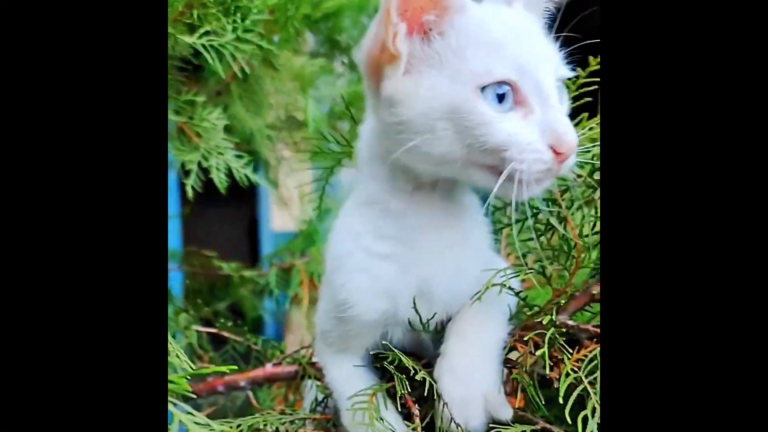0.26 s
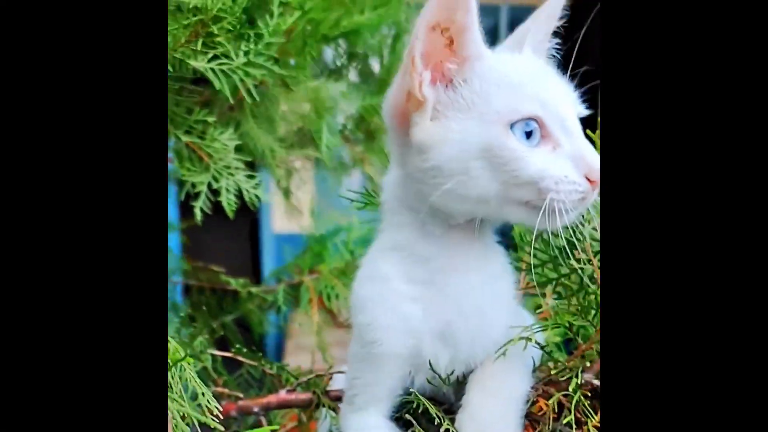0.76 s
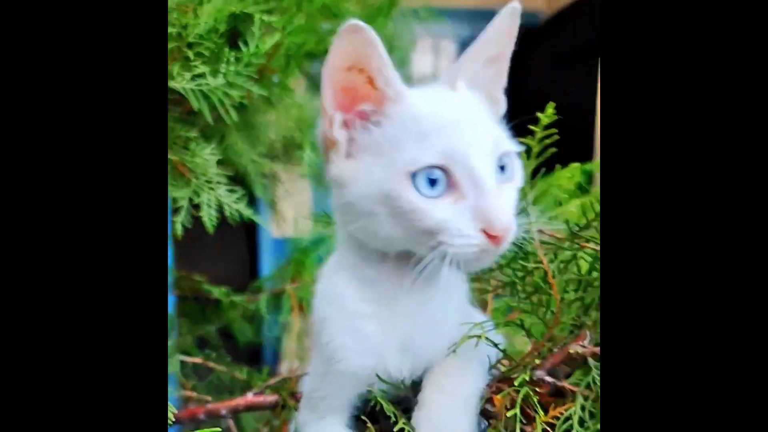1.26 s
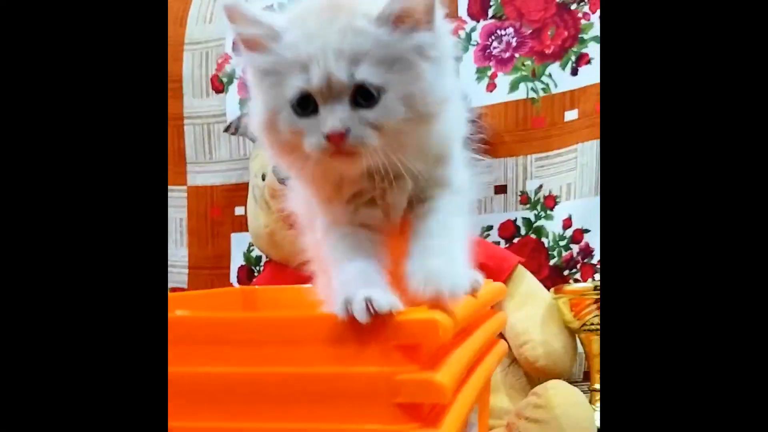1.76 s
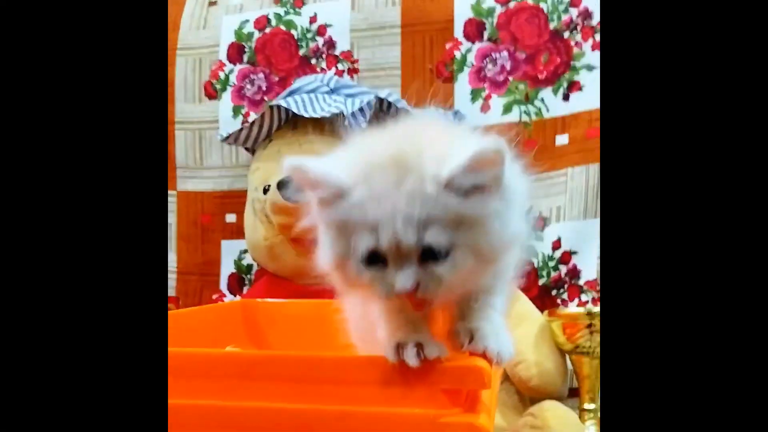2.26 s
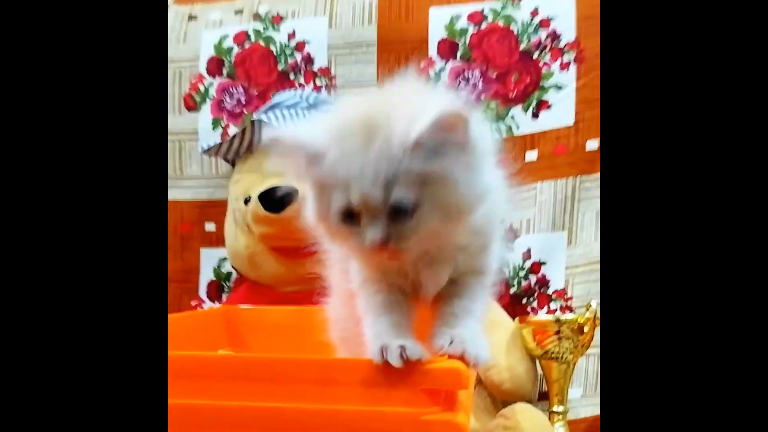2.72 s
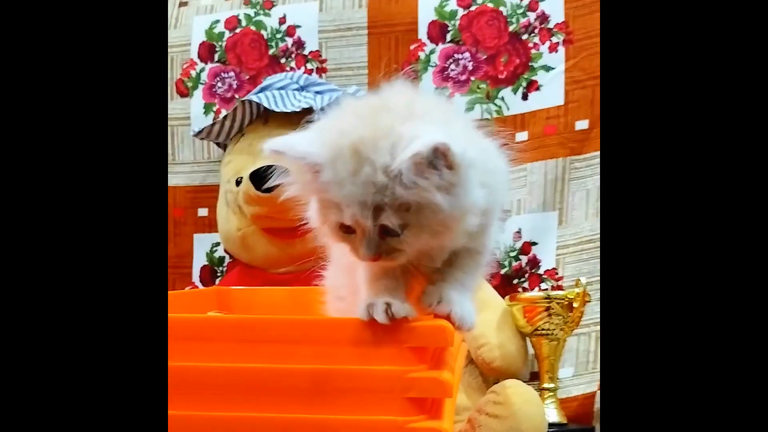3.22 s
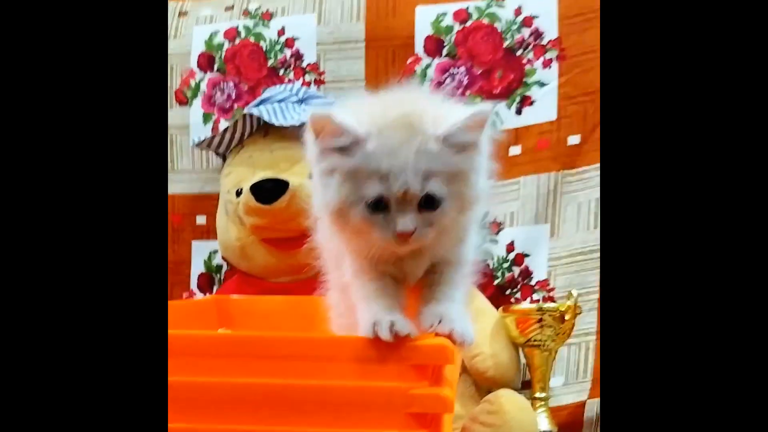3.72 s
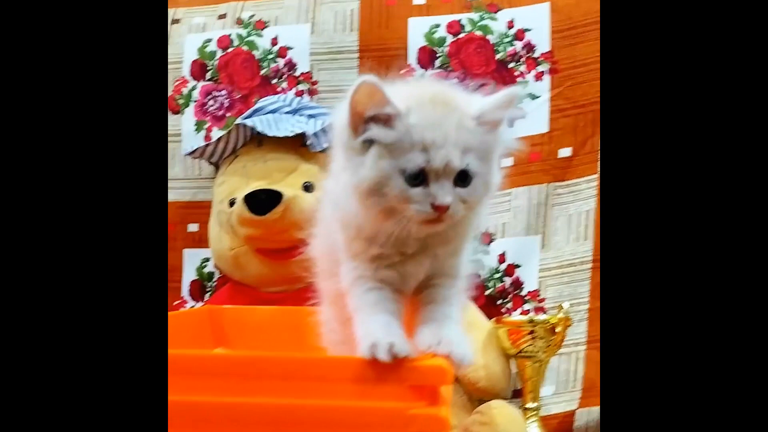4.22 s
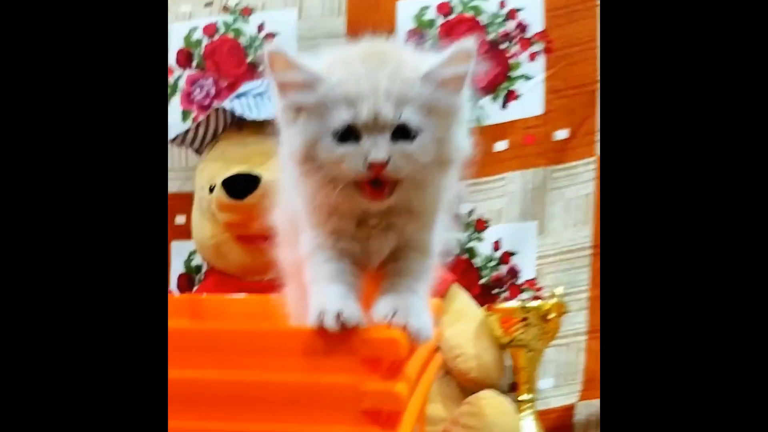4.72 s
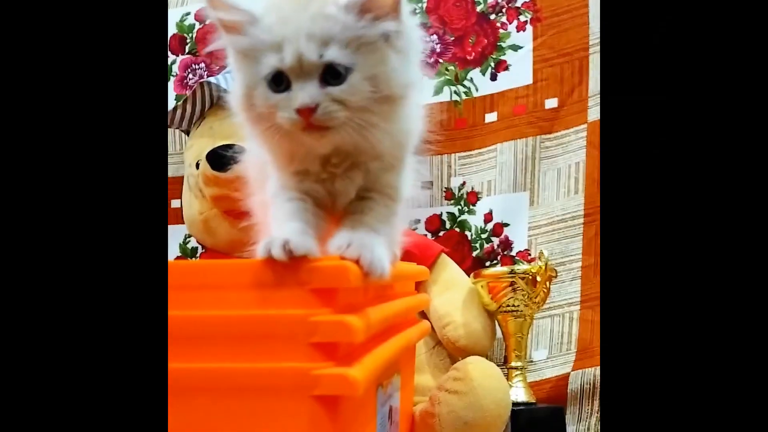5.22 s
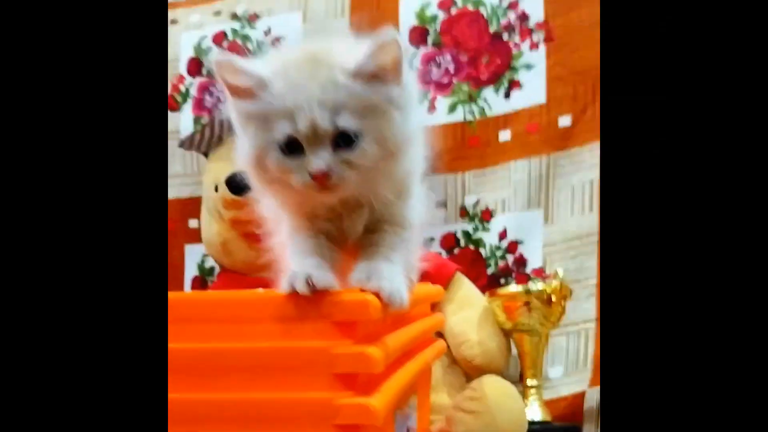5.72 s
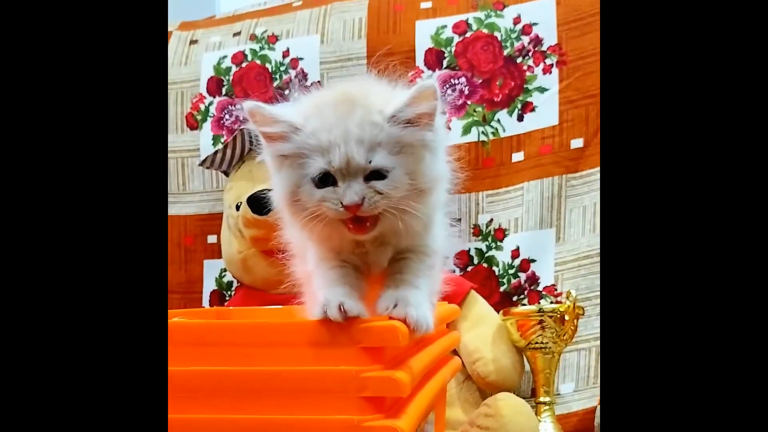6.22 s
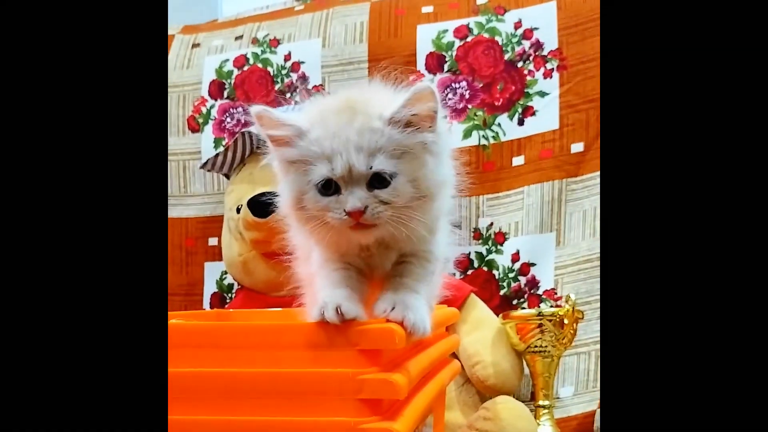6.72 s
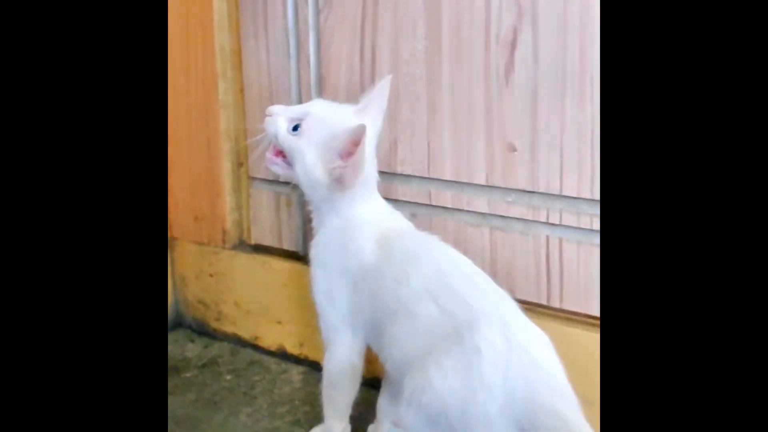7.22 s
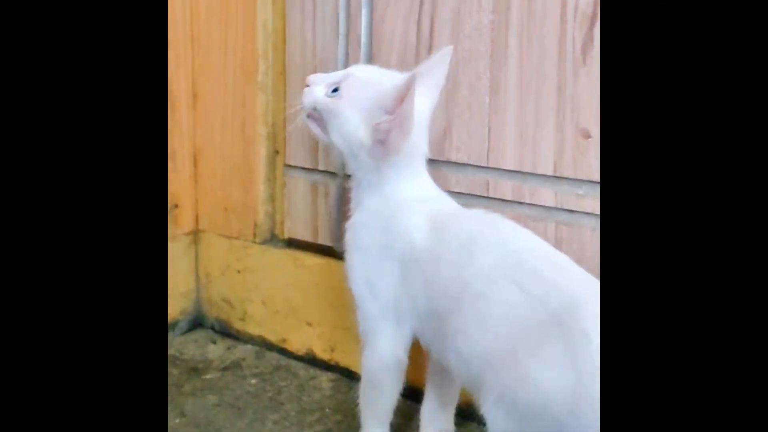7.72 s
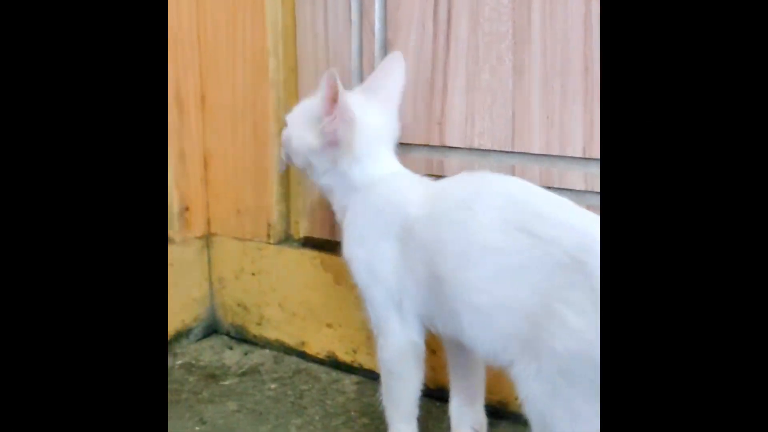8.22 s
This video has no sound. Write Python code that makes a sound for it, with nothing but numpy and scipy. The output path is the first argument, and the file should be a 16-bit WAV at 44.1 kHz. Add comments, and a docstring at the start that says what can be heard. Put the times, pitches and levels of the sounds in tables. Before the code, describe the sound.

A kitten cries sharply among chirping garden birds, then a fluffy kitten mews three times over a low indoor drone, and another gives one long meow.

```python
"""Three kittens cry in three places, one after the other: one cries once in a garden where birds whistle,
a fluffy one mews three times in a small room with a low, swelling drone, a third gives one long meow by a door.
Each voice is a stack of harmonics shaped by a moving mouth, with short rasps and a little room; its fundamental
swells once, and its overtones rise, hold and die away. Birds are gliding tones, air and rumble are coloured
noise, and knocks are short bursts of noise in a resonance."""
import sys
import numpy as np
from scipy import signal
from scipy.fft import rfft, irfft, next_fast_len
from scipy.io import wavfile
from scipy.ndimage import uniform_filter1d

SR = 44100
rng = np.random.default_rng(int(sys.argv[2]) if len(sys.argv) > 2 else 0)


def waveform_to_disk(signal):
    """Save audio, clipped to [-1, 1], as 16-bit WAV at the path in sys.argv[1]."""
    frames = np.transpose(np.atleast_2d(signal))
    scaled = np.clip(frames, -1, 1) * 32767
    samples = np.round(scaled).astype(np.int16)
    wavfile.write(sys.argv[1], SR, samples)


N = 373527
TIME = np.arange(N) / SR
TOP_HZ = 15450  # no harmonic sounds above this, and the final filter cuts here


def undb(db):
    """Turn decibels into gain."""
    return np.exp(np.asarray(db) * (np.log(10) / 20))


def unit(x):
    """Scale to rms 1."""
    return x / np.sqrt(np.mean(x ** 2) + 1e-20)


def curves(table, t=TIME):
    """Join each column of a table by straight lines in time."""
    s, *columns = np.transpose(table)
    return [np.interp(t, s, column) for column in columns]


def colour(points, hz):
    """Gain of a spectrum at the given frequencies, joined in dB over log frequency."""
    f, db = np.transpose(points)
    return undb(np.interp(np.log(np.maximum(hz, 1)), np.log(f), db))


def noise(points):
    """Noise with the given spectrum, rms 1."""
    size = next_fast_len(N)
    spectrum = rfft(rng.standard_normal(size))
    spectrum = spectrum * colour(points, np.fft.rfftfreq(size, 1 / SR))
    return unit(irfft(spectrum, size)[:N])


def walk(rate, size=N):
    """Smooth random wander with about `rate` turns a second, rms about 1."""
    k = max(int(SR / rate), 1)
    steps = np.repeat(rng.standard_normal(size // k + 1), k)
    return unit(uniform_filter1d(steps, k))[:size]


def during(start, end, t=TIME):
    """1 between two times, with 4 ms fades inside them."""
    return np.clip(np.minimum(t - start, end - t) / .004, 0, 1)


def swell(t, peak_s, fall_s):
    """One arch of level in dB, 10 down at fall_s either side of its peak."""
    return -10 * ((t - peak_s) / fall_s) ** 2


def room(x, t60, wet_db):
    """Add a dense tail of reflections that falls 60 dB in t60 seconds."""
    t = TIME[:SR]
    tail = rng.standard_normal(SR) * undb(-60 * t / t60) * (t > .003)
    tail = tail / np.linalg.norm(tail)
    return x + undb(wet_db) * signal.fftconvolve(x, tail)[:N]


def resonance(hz, db, centre_hz, width_hz):
    """Gain of one steep resonance."""
    return undb(db) / (1 + ((hz - centre_hz) / width_hz) ** 2) ** 2


# bird whistles: [t/s, length/s, start f/Hz, end f/Hz, level/dB]
WHISTLES = [(.035, .045, 4150, 8200, -49.5), (.04, 0.084, 2440, 2800, -49),
            (0.105, 0.013, 7700, 4100, -44.5), (0.114, 0.055, 4040, 3850, -41),
            (0.438, 0.013, 4900, 3850, -41), (0.752, 0.017, 6530, 4930, -51),
            (0.763, 0.042, 4830, 4520, -41), (0.781, .1, 2070, 1960, -49.5), (.9, .05, 2210, 2290, -51),
            (.97, .06, 3750, 3400, -52), (1.096, 0.046, 4460, 4050, -42.5),
            (1.133, 0.018, 4960, 5070, -37.5), (1.158, 0.02, 5270, 5430, -39),
            (1.19, .028, 5650, 5740, -47), (1.216, 0.023, 6400, 6840, -46.5),
            (1.245, 0.022, 7900, 8200, -49.5), (1.344, 0.057, 1790, 2266, -46),
            (1.384, 0.067, 2230, 2390, -41), (1.523, 0.021, 2850, 2500, -38),
            (1.548, 0.023, 2960, 2725, -35.5), (1.572, 0.039, 2858, 2538, -31.5),
            (1.616, 0.043, 2850, 2640, -37.5), (1.655, 0.016, 2820, 2640, -42),
            (1.67, 0.032, 2172, 1802, -42)]


def birds(waver):
    """Bird whistles are short, nearly pure tones that glide from one pitch to another."""
    out = np.zeros(N)
    for s, length, start_hz, end_hz, db in WHISTLES:
        u = np.linspace(0, 1, int(length * SR))
        hz = start_hz * (end_hz / start_hz) ** u * (1 + waver * walk(300, len(u)))
        tone = np.sin(2 * np.pi * np.cumsum(hz) / SR)
        arch = np.sqrt(u * (1 - u))
        out[int(s * SR):][:len(u)] += undb(db) * unit(arch * tone)
    return out


# spectrum of the open air: [f/Hz, relative level/dB]
GARDEN_AIR = [(120, -62.5), (200, -33.5), (506, -24), (827, -4.5), (1010, -14.5), (1910, -1.5), (3480, -8),
              (4260, -3), (4660, -12), (5110, -8), (7480, -20.5), (15500, -24)]
# spectrum of the gust, strongest in the bass: [f/Hz, relative level/dB]
GARDEN_GUST = [(30, -8), (80, 1.5), (150, -7.5), (300, -11.5), (600, -21), (1500, -26.5), (4000, -24),
               (8000, -33), (15000, -27.5)]


def garden_background():
    """Birds with echo, open air that differs between left and right, and a low gust, all from noise or glides."""
    gust = undb(-42.0) * noise(GARDEN_GUST) * during(0.1475, .825)
    song = room(birds(waver=0.015), t60=1.0, wet_db=-2)
    far = song + undb(-50) * noise(GARDEN_AIR) * undb(1.3 * walk(17))
    # opposite signs in the two channels make the air sound wide
    spread = undb(-50.5) * noise(GARDEN_AIR) * np.array([[1], [-1]])
    return gust + far * undb(np.array([[-1.2], [1.2]])) + spread


# centre pitch of the drone before it wavers: [t/s, f/Hz]
DRONE_PITCH = [(1.94, 53), (3.47, 56), (3.82, 58), (4.6, 59), (5.7, 52), (7.16, 55.5)]
# loudness of the drone before a 0.15 dB cut: [t/s, level/dB]
DRONE_LEVEL = [(1.95, -40), (2.51, -52.5), (2.82, -36.5), (3.44, -23.5), (3.98, -27.5), (4.02, -33.5),
               (4.33, -33), (5.03, -52), (5.35, -38.5), (6.38, -54), (6.41, -44), (7.0, -32), (7.06, -44),
               (7.15, -39)]


def drone():
    """A low tone with two weaker overtones, randomly wavering in pitch."""
    hz, = curves(DRONE_PITCH)
    level_db, = curves(DRONE_LEVEL)
    phase = 2 * np.pi * np.cumsum(hz * (1 + 0.028 * walk(24.91))) / SR
    tone = np.sin(phase) + undb(-15.5) * np.sin(2 * phase) + undb(-27.5) * np.sin(3 * phase)
    return undb(level_db - 0.15) * unit(tone)


# loudness of the room rumble before a 1.93 dB cut: [t/s, level/dB]
RUMBLE_LEVEL = [(1.94, -43), (2.4, -45), (3.42, -37), (4.1, -39), (4.52, -30.5), (4.7, -34.5),
                (5.55, -34.5), (6.15, -47.5), (6.48, -37.5), (6.62, -43), (7.0, -37.5)]
# spectrum of the rumble: [f/Hz, relative level/dB]
RUMBLE_COLOUR = [(12, -36), (20, -21.5), (43, -5), (64, 5), (166, -3.5), (214, -6.5), (362, -19),
                 (400, -13), (520, -44), (880, -120)]


def rumble():
    """Low noise that rises and falls in the small room."""
    return undb(curves(RUMBLE_LEVEL)[0] - 1.93) * noise(RUMBLE_COLOUR)


# loudness of the room rush before its flicker: [t/s, body level/dB, hiss level/dB]
RUSH_LEVELS = [(1.94, -49, -63.5), (2.6, -50, -63), (2.95, -42, -52.5), (3.4, -42.5, -52.5),
               (4.15, -50.5, -53.5), (4.65, -41, -58), (5.1, -39.5, -54), (5.85, -46.5, -60),
               (5.9, -39.5, -62), (6.18, -53.5, -68.5), (6.4, -41.5, -73), (6.8, -44.5, -53.5),
               (7.16, -49, -56)]
# spectrum of the rush's body: [f/Hz, relative level/dB]
RUSH_COLOUR = [(200, -27.5), (320, -4), (430, 2), (620, -5), (800, 1), (1300, -2), (1800, -2), (2250, -8.5),
               (2800, -41.5), (15500, -84)]
# spectrum of the rush's hiss: [f/Hz, relative level/dB]
HISS_COLOUR = [(2800, -39), (3400, -4), (3900, 1.5), (4500, -6), (5400, -21.5), (6300, -7), (7400, -6.5),
               (8400, -16.5), (10000, -24), (12000, -24), (14500, -21), (15500, -28)]
# one swell of thin, high hiss: [peak t/s, time to fall 10 dB/s, level/dB]
AIR_SWELL = (4.6, 1.05, -54)
# spectrum of the thin hiss: [f/Hz, relative level/dB]
AIR_COLOUR = [(4000, -28), (7000, -1), (10000, -5.5), (12500, -1.5), (14500, 0.5), (15500, -5.5)]


def rush():
    """Noise in two bands with a slight flicker, plus a thin, high hiss that swells once."""
    body_db, hiss_db = curves(RUSH_LEVELS)
    flicker = undb(0.71 * walk(26))
    bands = undb(body_db) * noise(RUSH_COLOUR) + undb(hiss_db) * noise(HISS_COLOUR)
    peak_s, fall_s, air_db = AIR_SWELL
    thin = undb(air_db + swell(TIME, peak_s, fall_s)) * noise(AIR_COLOUR)
    return flicker * bands + thin


# spectrum of the air by the door: [f/Hz, relative level/dB]
DOOR_AIR = [(18, -50.5), (30, -22), (123, -3), (315, -14), (399, 4), (787, -23), (921, -15), (2020, -18),
            (2300, -19), (3780, -30.5), (4540, -36), (8950, -43.5), (15500, -32)]


def door_background():
    """Mostly low noise whose level wanders a little."""
    return undb(-51.0 + 1.0 * walk(7.2)) * noise(DOOR_AIR)


# soft knocks and ticks, and a breathy puff as the door meow ends: [t/s, centre f/Hz, width/Hz, decay/s,
# level/dB]
KNOCKS = [(2.316, 100, 69.6, 0.027, -34), (2.882, 446, 129, 0.0071, -28.5),
          (3.104, 380, 258, 0.0043, -27.5), (3.277, 6400, 9000, .0031, -39.5),
          (3.334, 6160, 9000, .0042, -43), (7.209, 910, 1400, 0.018, -58), (7.26, 136, 40, 0.068, -46),
          (8.001, 3560, 500, .0015, -42), (8.17, 4520, 3000, 0.025, -59)]
# a small smack of the mouth ends each of the fluffy kitten's mews: [t/s, level/dB]
SMACKS = [(2.775, -39.5), (4.985, -48), (6.766, -49)]
SMACK_HZ, SMACK_WIDTH_HZ, SMACK_DECAY_S = 6400, 7500, 0.011


def knocks():
    """Knocks, ticks, mouth smacks and a closing breath: brief dying bursts of noise, each in one steep
    resonance."""
    out, t = np.zeros(N), TIME[:SR // 8]
    smacks = [(s, SMACK_HZ, SMACK_WIDTH_HZ, SMACK_DECAY_S, db) for s, db in SMACKS]
    for s, hz, width_hz, decay, db in KNOCKS + smacks:
        push = rng.standard_normal(len(t)) * np.exp(-t / decay)
        body = signal.iirpeak(hz, hz / width_hz, fs=SR)
        ring = signal.lfilter(*body, signal.lfilter(*body, push))
        # a longer decay gets more energy, so that the level stays comparable
        ring = undb(db) * ring * np.sqrt(decay * SR / np.sum(ring ** 2))
        place = out[int(s * SR):][:len(t)]
        place += ring[:len(place)]
    return out


# the fundamental swells once from a plateau:
# [peak t/s, time to fall 10 dB/s, fade at the ends/s, peak level/dB, plateau level/dB]
SWELLS = dict(garden=(0.7, 0.2, 0.14, -31.5, -39.5), mew_1=(2.33, 0.2, 0.03, -40.5, -50),
          mew_2=(4.61, 0.27, 0.1, -31.5, -40.5), mew_3=(6.39, 0.18, 0.02, -30.5, -44.5),
          door=(8.04, 0.15, 0.18, -39, -43.5))
# the overtones wait, rise, hold and die away; sheen tilts the very top:
# [wait/s, attack/s, hold/s, release/s, peak level/dB, sheen level/dB]
EFFORTS = dict(garden=(.004, .051, .18, .74, -43, -2), mew_1=(.07, .1, .2, .28, -34.5, -17),
           mew_2=(.004, .1, .22, .43, -39, 2), mew_3=(.004, .05, .2, .52, -32.5, -1),
           door=(.004, .12, .12, .25, -33.5, 2))
# the mouth resonance changes its width, then settles: [start width/Hz, settled width/Hz, time to settle/s]
MOUTH_WIDTHS = dict(garden=(2100, 750, 0.18), mew_1=(1760, 700, .23), mew_2=(1200, 730, 0.11),
                mew_3=(1280, 790, 0.12), door=(470, 830, 0.23))
# overtone levels against their peak: at the very start, as they set in, after the release
SILENT_DB, ATTACK_FROM_DB, RELEASE_TO_DB = -70, -34, -33


def controls(table, name, t):
    """Pitch, mouth and the levels of fundamental and overtones through one meow."""
    pitch, mouth_db, mouth_hz = curves(table, t)
    peak_s, fall_s, fade_s, low_db, plateau_db = SWELLS[name]
    wait_s, attack_s, hold_s, release_s, over_db, sheen_db = EFFORTS[name]
    start_hz, settled_hz, settle_s = MOUTH_WIDTHS[name]
    age = t - t[0]
    fade = np.clip(np.minimum(age, t[-1] - t) / fade_s, 1e-3, 1)
    low_db = np.maximum(low_db + swell(t, peak_s, fall_s), plateau_db) + 20 * np.log10(fade)
    stages = np.cumsum([0, wait_s, attack_s, hold_s, release_s])
    over_db = over_db + np.interp(age, stages, [SILENT_DB, ATTACK_FROM_DB, 0, 0, RELEASE_TO_DB])
    width_hz = np.interp(age, [0, settle_s], [start_hz, settled_hz])
    return pitch, low_db, mouth_db, mouth_hz, width_hz, over_db, sheen_db


# moments when a voice breaks: [t/s, half length/s, rasp 0-1, period doubling 0-1]
RASPS = [(.233, .008, .2, .1), (.253, .008, .4, 1), (.29, .025, .05, .03), (.335, .015, .08, .05),
         (2.275, .03, .2, .02), (2.348, .03, .28, .12), (2.39, .015, .1, .04), (2.46, .05, .04, .03),
         (2.76, .04, .35, 0), (4.385, .03, .45, .1), (4.565, .07, .12, .12), (4.562, .03, .1, .6),
         (4.64, .04, .02, .15), (4.975, .04, .5, 0), (6.243, .022, .5, .1), (6.29, .025, .12, .06),
         (6.375, .045, .13, .08), (6.455, .025, .16, .2), (6.59, .04, .12, 0), (6.755, .035, .6, 0),
         (7.635, .025, .2, .25), (7.715, .015, .38, .12), (7.8, .02, .12, .05)]
# a second, higher resonance glides as the jaw moves: [t/s, level/dB, centre f/Hz]
UPPER_RESONANCE = dict( garden=[(.15, -47.5, 4570), (.2, -21, 5520), (.225, -26, 5960), (.245, -15, 5600),
                   (.254, -13, 4800), (.263, -10, 5600), (.275, -8, 5680), (.305, -23.5, 5870),
                   (.32, -12.5, 5740), (.36, -28.5, 5950), (.5, -35, 6130), (.57, -43.5, 6400),
                   (.825, -56, 6100)], mew_1=[(2.24, -75.5, 6400), (2.28, -45, 6550), (2.35, -30.5, 6960),
                   (2.42, -39.5, 6160), (2.52, -37.5, 6560), (2.58, -39.5, 5850), (2.63, -52, 5990),
                   (2.78, -70, 5900)], mew_2=[(4.35, -54, 4000), (4.385, -33.5, 3900), (4.42, -37, 3970),
                   (4.43, -54, 7250), (4.58, -43.5, 7140), (4.65, -52, 6190), (4.72, -36.5, 5200),
                   (4.8, -37, 5800), (4.9, -60, 5600), (4.96, -53, 3980)], mew_3=[(6.21, -59.5, 4360),
                   (6.247, -27, 4400), (6.275, -48, 5150), (6.32, -37, 5300), (6.37, -36, 6600),
                   (6.42, -36, 7200), (6.46, -29, 7600), (6.53, -40, 7400), (6.6, -41.5, 6330),
                   (6.66, -43, 5500), (6.72, -51, 4200), (6.785, -56, 4000)], door=[(7.26, -73, 3000),
                   (7.33, -47, 3540), (7.37, -44, 4360), (7.47, -40, 4400), (7.515, -32, 4250),
                   (7.57, -38, 4800), (7.65, -40, 4600), (7.71, -51, 4600), (7.75, -62, 4600),
                   (7.83, -57, 4170), (7.96, -79, 4500), (8.06, -64, 4600), (8.19, -68, 4530)])
# indoors a third, high resonance is stirred largely by turbulence: [t/s, level/dB, centre f/Hz]
TOP_RESONANCE = dict( mew_1=[(2.24, -84, 11000), (2.275, -52, 11100), (2.31, -53, 11200),
                 (2.345, -44, 11000), (2.39, -46, 8900), (2.57, -48, 8800), (2.62, -56, 9500),
                 (2.68, -54, 9700), (2.78, -65, 9500)], mew_2=[(4.36, -66, 9000), (4.45, -41.5, 9900),
                 (4.56, -46, 10200), (4.68, -64, 9500), (4.84, -51, 8300), (4.91, -57, 8500),
                 (4.96, -48, 8100), (5.0, -49, 7400)], mew_3=[(6.21, -63, 10500), (6.25, -49, 10800),
                 (6.33, -46, 9900), (6.47, -45, 8400), (6.53, -52, 9500), (6.6, -46, 10000),
                 (6.69, -43, 9900), (6.74, -52, 10000), (6.785, -48, 9700)], door=[(7.26, -80, 8500),
                 (7.46, -68, 8600), (7.52, -53, 9200), (7.58, -61, 6900), (7.72, -65, 7000),
                 (7.78, -68, 9600), (8.19, -84, 8500)])
UPPER_WIDTH_HZ, TOP_WIDTH_HZ = 840, 1500
TOP_TURBULENCE = 1.3  # random part of the third resonance against its steady part
DOUBLING_FULL_HZ = 3630  # the lines of period doubling fade away below this
VOICE_FADE_S = 0.0099


def meow(table, name, throat, jitter, shimmer, airy_hz, rasp_depth):
    """Vocal-fold harmonics through moving resonances; towards airy_hz and in rasps they grow noisy."""
    span = (TIME >= table[0][0]) & (TIME <= table[-1][0])
    t = TIME[span]
    size = len(t)
    pitch, low_db, mouth_db, mouth_hz, width_hz, over_db, sheen_db = controls(table, name, t)
    upper_db, upper_hz = curves(UPPER_RESONANCE[name], t)
    top_db, top_hz = curves(TOP_RESONANCE[name], t) if name in TOP_RESONANCE else (-np.inf, 0)
    rasp, doubling = 0, 0
    for s, length, rough, double in RASPS:
        bump = np.exp(-((t - s) / length) ** 2)
        rasp = rasp + rough * bump
        doubling = doubling + double * bump

    def tract(hz):
        """Gain of mouth and throat at a frequency; sheen tilts the very top."""
        mouth = resonance(hz, mouth_db, mouth_hz, width_hz)
        upper = resonance(hz, upper_db, upper_hz, UPPER_WIDTH_HZ)
        sheen = sheen_db * np.clip(np.log2(hz / 7000), 0, 1)
        overtones = undb(over_db + sheen) * colour(throat, hz)
        return np.hypot(np.hypot(mouth, upper), overtones) * (hz < TOP_HZ)

    def flutter(rate):
        """Random swings of a harmonic's size and phase, spreading it over about `rate` Hz."""
        real = unit(uniform_filter1d(walk(rate, size), SR // 1400))
        imaginary = unit(uniform_filter1d(walk(rate, size), SR // 1400))
        return real + 1j * imaginary

    shake = jitter * walk(180, size) + rasp_depth * rasp * walk(450, size)
    phase = 2 * np.pi * np.cumsum(pitch * (1 + shake)) / SR
    voice = undb(low_db) * np.sin(phase)
    for k in np.arange(2, int(TOP_HZ / np.median(pitch)) + 1):
        hz = k * pitch
        # turbulence smears the high harmonics first
        air = .5 * rasp + .5 / (1 + (airy_hz / hz) ** 5)
        line = (1 + shimmer * walk(45, size) + air * flutter(700)) / np.sqrt(1 + 2 * air ** 2)
        hiss = (1 + TOP_TURBULENCE * flutter(1100)) / np.sqrt(1 + 2 * TOP_TURBULENCE ** 2)
        top = resonance(hz, top_db, top_hz, TOP_WIDTH_HZ)
        voice += np.imag((tract(hz) * line + top * hiss) * np.exp(1j * k * phase))
        # alternate strong and weak cycles put lines halfway between
        if k < 8:
            half = hz + pitch / 2
            wobble = 1 + air * flutter(700).real
            strength = doubling * wobble * np.minimum(half / DOUBLING_FULL_HZ, 1) ** 4
            voice += strength * tract(half) * np.sin((k + .5) * phase)
    fade = during(t[0], t[-1], t) * np.minimum((t[-1] - t) / VOICE_FADE_S, 1)
    out = np.zeros(N)
    out[span] = np.sqrt(2) * voice * fade  # root 2: levels in dB are rms
    return out


# course of the garden meow: [t/s, pitch f/Hz, mouth resonance level/dB, mouth centre f/Hz]
GARDEN_MEOW = [(0.15, 1006, -47, 3500), (0.188, 1230, -37.5, 3450), (0.222, 1300, -27.5, 2980),
               (0.24, 1350, -16, 3150), (0.246, 1280, -17, 3300), (0.254, 1246, -11, 4100),
               (0.26, 1255, -16, 3500), (0.268, 1272, -15.5, 3350), (0.293, 1320, -6, 3640),
               (0.311, 1324, -4, 3650), (0.315, 1295, -5.5, 3580), (0.343, 1320, -7.5, 3500),
               (0.35, 1368, -10, 3385), (0.42, 1341, -10.5, 3260), (0.487, 1313, -13, 2790),
               (0.52, 1267, -7, 2460), (0.539, 1221, -3.5, 2360), (0.545, 1270, -19, 2500),
               (0.562, 1324, -33, 2750), (0.661, 1326, -54, 2900), (0.75, 1250, -45, 2660),
               (0.825, 1186, -46, 2450)]
# colour of its overtones: [f/Hz, level/dB]
GARDEN_THROAT = [(2600, -2.5), (3500, -15.5), (5300, -8.5), (6200, -6), (7200, -14.5), (8200, -20.5),
                 (8900, 0.5), (9700, -10), (10700, 2), (11700, -7), (13000, -5.5), (15500, -20.5)]
# the kitten sits off to one side: [f/Hz, left minus right level/dB]
GARDEN_PAN = [(1300, -1.5), (2600, -1.5), (4000, 5), (5200, 12.5), (6500, 6), (12000, 13)]


def garden_kitten():
    """One close cry, reaching the left channel a little earlier and with its own balance at each pitch."""
    cry = meow(GARDEN_MEOW, "garden", GARDEN_THROAT, jitter=.0015, shimmer=.11, airy_hz=13000, rasp_depth=.04)
    cry = room(cry, t60=.2, wet_db=-26)
    hz = np.fft.rfftfreq(N, 1 / SR)
    lead_s = .00011  # left ahead of right
    left = np.sqrt(colour(GARDEN_PAN, hz)) * np.exp(1j * np.pi * hz * lead_s)
    sides = np.array([left, 1 / left])
    sides = sides / np.sqrt(np.mean(abs(sides) ** 2, axis=0))
    return irfft(rfft(cry) * sides, N)


# courses of the three fluffy mews: [t/s, pitch f/Hz, mouth resonance level/dB, mouth centre f/Hz]
FLUFFY_MEOW_1 = [(2.17, 632, -62, 700), (2.22, 880, -60, 1100), (2.24, 995, -52, 2100),
                 (2.26, 1036, -31, 2900), (2.288, 1086, -19.5, 3040), (2.336, 1108, -15, 3150),
                 (2.35, 1020, -11.5, 3500), (2.366, 967, -12.5, 3650), (2.39, 981, -11, 3740),
                 (2.44, 1001, -14.5, 3930), (2.48, 982, -18.5, 3750), (2.505, 993, -14.5, 3590),
                 (2.547, 975, -19, 3600), (2.591, 902, -25.5, 3360), (2.657, 921, -31.5, 2820),
                 (2.71, 872, -43.5, 2580), (2.78, 810, -45, 2210)]
FLUFFY_MEOW_2 = [(4.33, 767, -47, 1000), (4.36, 712, -35, 1290), (4.383, 842, -24.5, 1900),
                 (4.412, 977, -36.5, 3180), (4.474, 1042, -30, 3200), (4.52, 1052, -33, 3440),
                 (4.555, 1057, -22.5, 3800), (4.605, 1068, -31.5, 3500), (4.681, 1065, -29, 2760),
                 (4.76, 1028, -29.5, 2830), (4.83, 988, -37.5, 2934), (4.922, 901, -37, 2110),
                 (4.965, 810, -30, 1850), (5.0, 691, -46, 1700)]
FLUFFY_MEOW_3 = [(6.208, 785, -36, 1200), (6.232, 758, -31, 1550), (6.246, 851.5, -23.5, 2240),
                 (6.268, 978, -27, 2870), (6.3, 1069, -13.5, 3330), (6.355, 1050, -17.5, 3630),
                 (6.417, 1051, -12.5, 3550), (6.435, 990.3, -18, 2830), (6.559, 954, -17, 3060),
                 (6.579, 899, -17.5, 3030), (6.638, 921, -15.5, 2750), (6.655, 940, -23.5, 2560),
                 (6.69, 932, -26.5, 2420), (6.73, 880, -32, 2160), (6.76, 788, -41, 2000),
                 (6.785, 792, -51, 2000)]
# colour of their overtones: [f/Hz, level/dB]
FLUFFY_THROAT = [(2100, -0.5), (3000, -9), (3600, -4.5), (4500, 6), (5300, -33), (6200, -11), (7200, -8),
                 (8300, -12.5), (9500, -17), (11000, -18), (13000, -23), (15500, -24.5)]
# the kitten's nose carves a deep hollow near 5 kHz, and nearby surfaces add further hollows and sharp peaks in
# the treble: [f/Hz, level/dB]
FLUFFY_HOLLOW = [(4350, 1), (4620, -14.5), (4900, -43.5), (5080, -23.5), (5270, -0.5), (5500, -11),
                 (5850, 8.5), (6150, -0.5), (6400, 3), (6650, -2), (7400, 2.5), (7850, 2.5), (8250, -3.5),
                 (9100, 0), (9600, 3), (9950, -8), (10400, 1.5), (10750, 4), (11150, -5), (11750, 6),
                 (12500, -0.5)]


def fluffy_kitten():
    """Three mews close to the walls of a small room, whose reflections colour the treble."""
    voice = dict(jitter=.0018, shimmer=.17, airy_hz=13500, rasp_depth=.035)
    mews = meow(FLUFFY_MEOW_1, "mew_1", FLUFFY_THROAT, **voice)
    mews += meow(FLUFFY_MEOW_2, "mew_2", FLUFFY_THROAT, **voice)
    mews += meow(FLUFFY_MEOW_3, "mew_3", FLUFFY_THROAT, **voice)
    hz = np.fft.rfftfreq(N, 1 / SR)
    # reflections from nearby surfaces ripple the treble, so overtones flash as they glide
    ripple = undb(2.2 * walk(60, len(hz)) * np.clip(hz / 4500 - 1, 0, 1) ** .5)
    mews = irfft(rfft(mews) * colour(FLUFFY_HOLLOW, hz) * ripple, N)
    return room(mews, t60=.2, wet_db=-14)


# course of the door meow: [t/s, pitch f/Hz, mouth resonance level/dB, mouth centre f/Hz]
DOOR_MEOW = [(7.26, 600, -68, 2290), (7.307, 674, -55, 3200), (7.371, 786, -40, 3810),
             (7.46, 790, -43, 3300), (7.515, 795, -37, 2530), (7.594, 767, -34, 2800),
             (7.67, 772.4, -32, 2850), (7.73, 769.5, -27, 2870), (7.79, 779, -31.5, 2700),
             (7.837, 791.4, -28.5, 2160), (7.87, 786, -36, 2040), (7.94, 775.4, -37.5, 2030),
             (8.045, 765, -41, 2044), (8.19, 730, -60, 1934)]
# colour of its overtones: [f/Hz, level/dB]
DOOR_THROAT = [(1500, -6), (2400, -18), (3500, -18), (4600, -9.5), (5300, -16), (6200, -17.5), (7200, -28),
               (8300, -29), (9500, -26), (11000, -49), (13000, -42), (15500, -37)]


def door_kitten():
    """One long, lower meow between hard walls; air hisses while the mouth is wide open."""
    cry = meow(DOOR_MEOW, "door", DOOR_THROAT, jitter=.0035, shimmer=.3, airy_hz=7500, rasp_depth=.03)
    open_mouth = np.exp(-((TIME - 7.62) / 0.27) ** 2)
    breath = noise([(60, -13), (600, 1.5), (1500, -2.5), (3500, 3.0), (6000, -18.0), (8000, -12), (14000, -11.5)])
    cry += undb(-46.0) * open_mouth * breath
    return room(cry, t60=.7, wet_db=-13)


def scene():
    """Three places in turn: the garden is in stereo, the indoor sounds and knocks sit in the middle."""
    garden = (garden_background() + garden_kitten()) * during(0, 1.712)
    playroom = drone() + rumble() + rush() + fluffy_kitten()
    # the sound drops out for an instant before the last mew
    playroom = playroom * (during(1.934, 5.858) + during(5.886, 7.168))
    doorway = (door_background() + door_kitten()) * during(7.208, 9)
    return garden + playroom + doorway + knocks()


def record(dry):
    """Clip peaks at 0.93 of full scale, then cut the top steeply."""
    low_pass = signal.ellip(10, .2, 90, TOP_HZ, fs=SR, output="sos")
    return signal.sosfilt(low_pass, np.clip(dry, -.93, .93))


dry = scene()
out = record(dry)
waveform_to_disk(out)
```